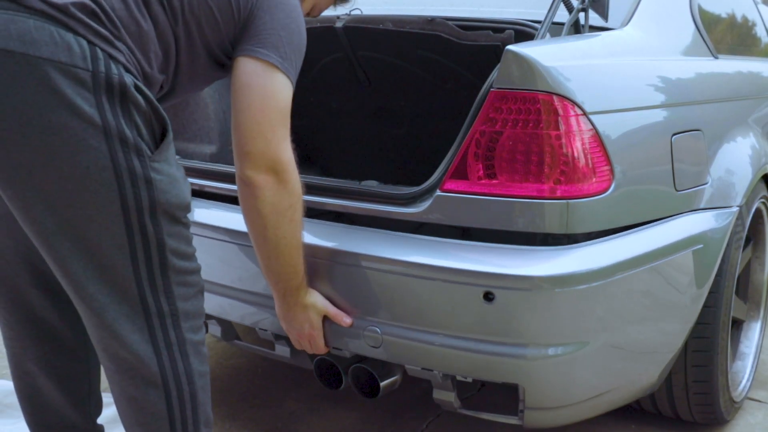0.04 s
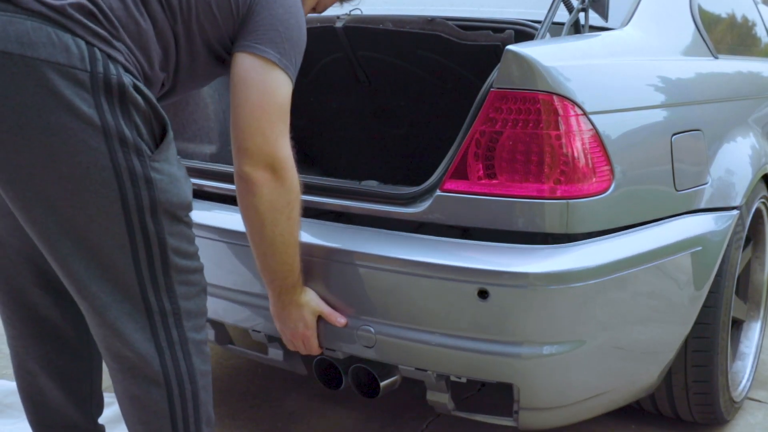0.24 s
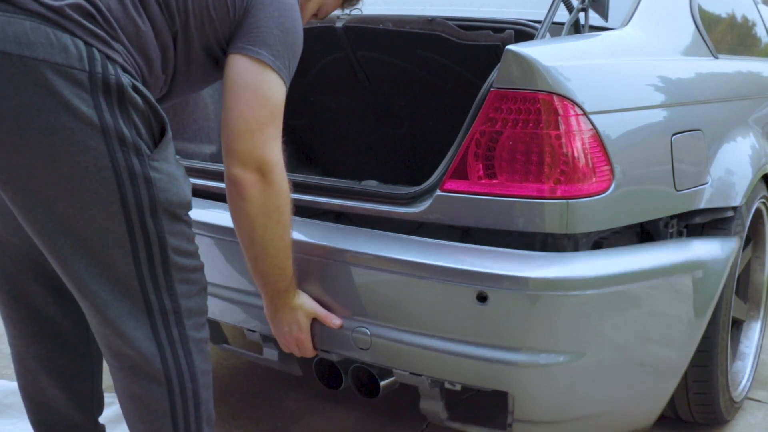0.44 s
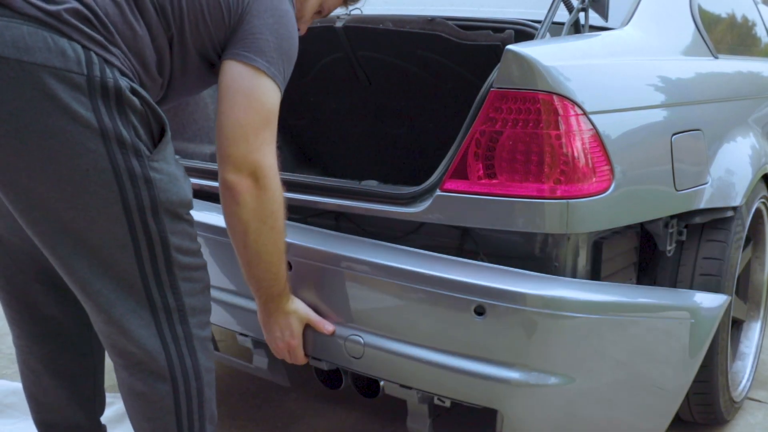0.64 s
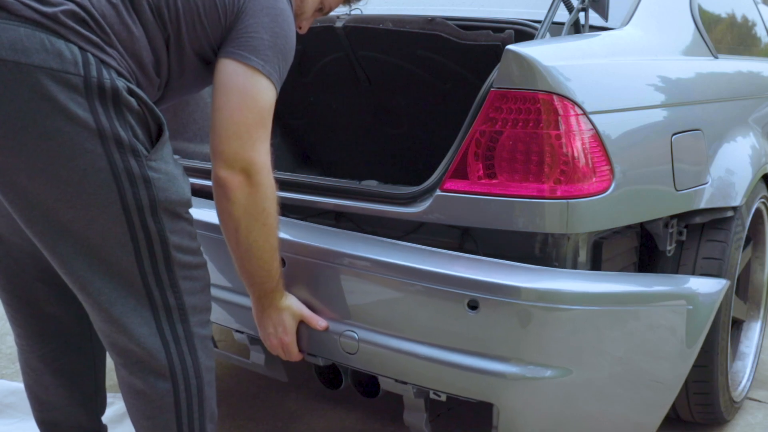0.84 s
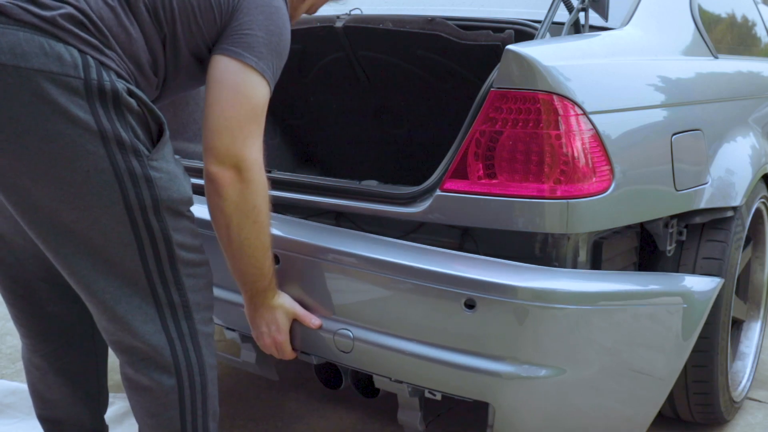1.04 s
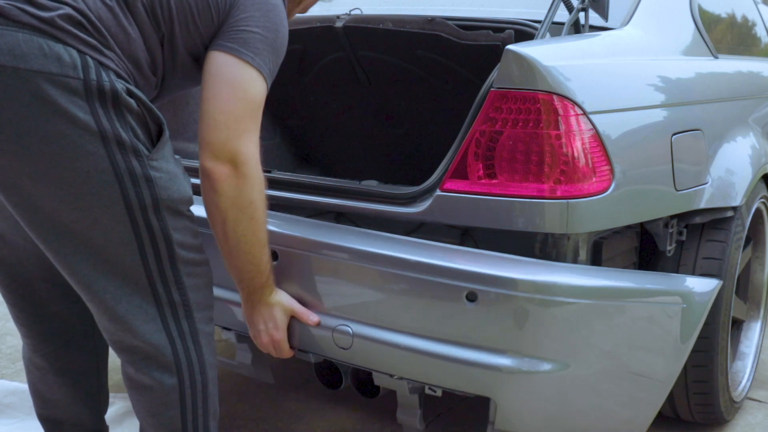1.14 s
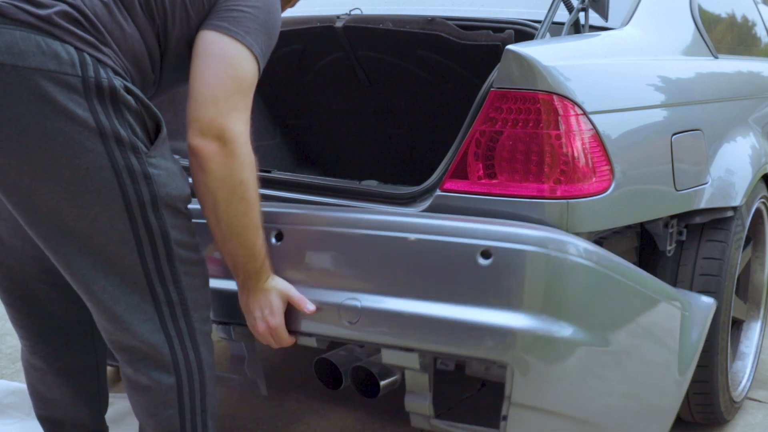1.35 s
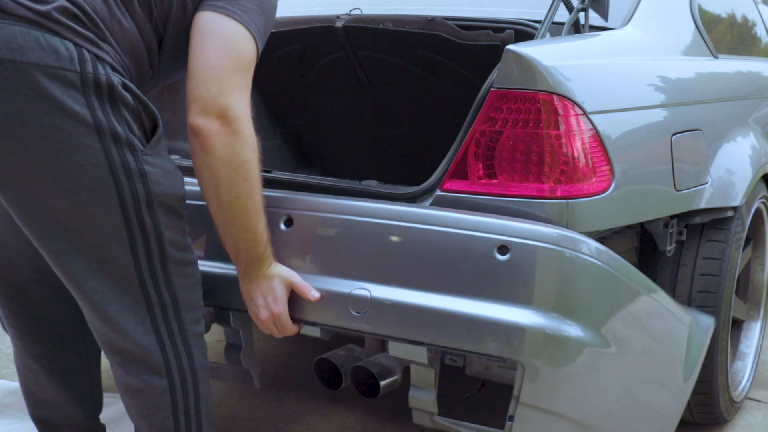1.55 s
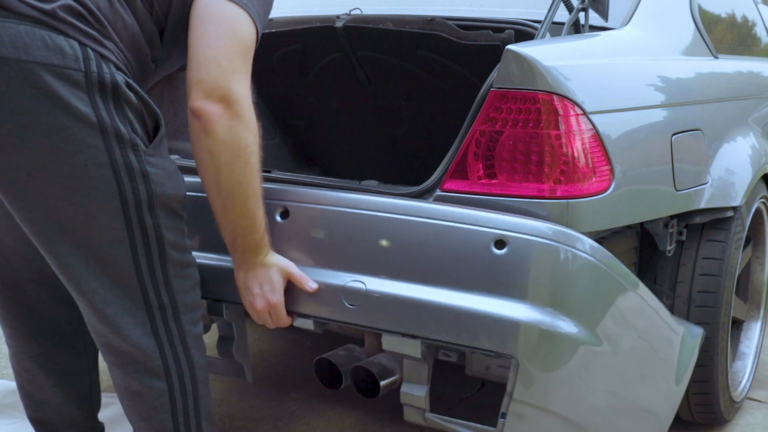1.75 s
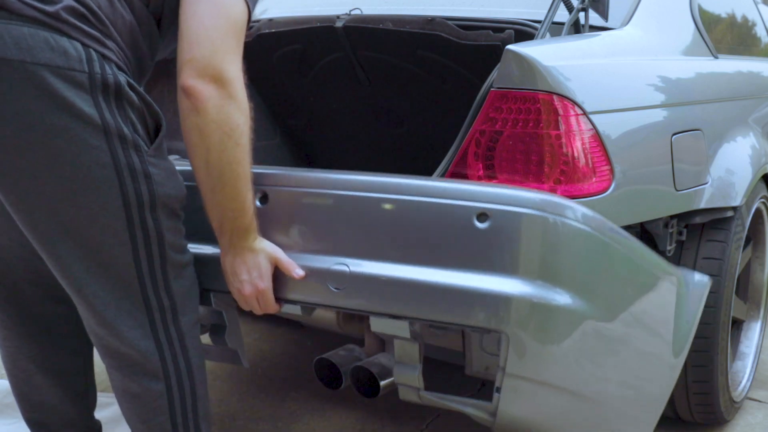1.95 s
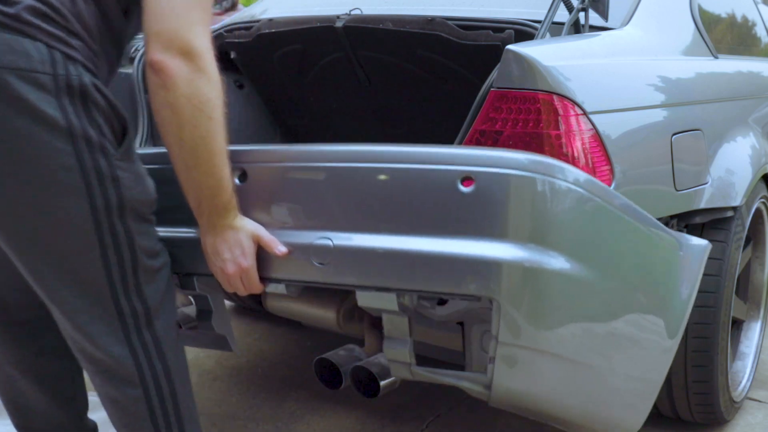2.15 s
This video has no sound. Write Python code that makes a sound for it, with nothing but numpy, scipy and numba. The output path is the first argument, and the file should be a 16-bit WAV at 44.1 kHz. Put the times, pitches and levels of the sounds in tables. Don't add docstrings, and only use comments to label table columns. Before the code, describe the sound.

A plastic car bumper cover is wrenched loose with hollow snaps, then knocks, slaps and scrapes

```python
import sys
import numpy as np
from scipy import signal
from scipy.io import wavfile
from scipy.ndimage import uniform_filter1d
from numba import njit

SR = 44100
rng = np.random.default_rng(int(sys.argv[2]) if len(sys.argv) > 2 else 0)


def materialize(psi):
    bounded = np.clip(np.atleast_2d(psi).T, -1, 1)
    quanta = np.round(bounded * 32767).astype(np.int16)
    wavfile.write(sys.argv[1], SR, quanta)


def magnitude_from_level(level_db):
    exponent = np.asarray(level_db, float) / 20
    return 10 ** exponent


N = 97020

# pitch_hz, level_db, t60_s
HUNG_MODES = [(175, 7, 0.079), (203, 1.5, 0.14), (288, -7, 0.1), (350, -8, 0.23), (460.7, -3.5, 0.095),
              (494.4, 6, 0.05), (775, -4.5, 0.06), (890, -5, 0.062), (1190, -11, 0.048), (1350, -16, 0.07),
              (1680, -12.5, 0.061), (1070, -7, 0.066), (2380, -10.5, 0.044), (3440, -13, 0.078)]
LOOSE_MODES = [(252, 3.5, 0.14), (296.8, -0.5, 0.16), (2620, 4.5, 0.038), (454.4, -14, 0.13),
               (561.8, 5.5, 0.083), (688.5, -2.5, 0.095), (745, -6, 0.046), (850, 1.5, 0.041),
               (1000, 0, 0.063), (1178, -5, 0.12), (1363, -4.5, 0.078), (1636, 2, 0.047), (2000, 1, 0.041),
               (2370, 3, 0.03)]
FREE_MODES = [(140, 1.5, 0.22), (183.6, -8, 0.33), (255.7, -3.5, 0.12), (280.5, -1.5, 0.23),
              (394, -2, 0.14), (442, 1.5, 0.051), (526, -3, 0.13), (690, 0.5, 0.027), (858, -0.5, 0.03),
              (1116, -7, 0.16), (1378, -8, 0.059), (1733, -7.5, 0.055), (2216, -8, 0.023),
              (3260, -19.5, 0.08)]
# pitch_hz, level_db, t60_s
RECOIL_MODES = [(260, -21, .09), (395, -6.5, 0.26), (500, -21, 0.13), (587, -2, .08), (662, -1.5, 0.078),
                (761, -1, 0.11), (855, 0.5, 0.045), (1034, -6, 0.1), (1145, -5.5, 0.097),
                (1383, -4.5, 0.079), (1590, -7, 0.054), (1960, -8, 0.13), (2130, -1.5, 0.062),
                (2150, -20, .08)]
# pitch_hz, level_db, t60_s
LIP_MODES = [(173, 7.5, .2), (262, 2.5, 0.1), (352, -3.5, 0.16), (420, -2.5, 0.26), (451, -7.5, 0.088),
             (496, 0, 0.23), (850, -9.5, 0.17), (1084, -0.5, 0.08), (1335, -1, 0.13), (1424, -2, 0.13),
             (1740, 2, .08), (2414, 8.5, 0.081), (2930, 11.5, 0.06), (3230, 19, 0.082)]

# start_s, peak_db, favoured_hz, crack_db, chatter_s
HUNG_BLOWS = [
    (.001, -32, 386, -18, 0.0073),
    (0.182, -25.5, 1000, -11.5, 0.029),
    (0.227, -0.5, 436, -5, 0.0041),
    (0.2475, -5, 432, -7, 0.0039),
    (.256, -4.5, 420, 0, 0.0056),
    (.281, -9, 536, -5.5, 0.0035),
    (0.294, -15, 453, -30, 0.0061),
    (.322, -20, 350, -9, 0.0041),
    (0.384, -40.5, 2000, 29, 0.0021),
]
LOOSE_BLOWS = [
    (0.464, -24.5, 350, -11, 0.0036),
    (0.502, -19, 534, -8, 0.016),
    (.533, -2.5, 790, -14.5, 0.007),
    (.540, -2.5, 620, -7, 0.0051),
    (0.565, -15, 297, -45, 0.0022),
]
RECOIL_BLOWS = [
    (0.595, -17.5, 800, -4.5, 0.006),
    (.603, -4, 840, -12.5, 0.0044),
    (0.627, -18.5, 776, -6, 0.0025),
]
CLIP_BLOWS = [
    (0.68, -34, 2640, 2, 0.0043),
    (0.691, -27, 700, 5, 0.0054),
    (.715, -40, 553, -14, 0.0026),
    (0.807, -35.5, 2120, 10, 0.023),
    (.828, -33.5, 2000, 9, 0.0082),
]
FREE_BLOWS = [(.848, -23.5, 243, -7, 0.0031), (0.876, -55, 203, -39, 0.0034),
              (0.934, -34.5, 195, -30.5, 0.0015), (1.05, -35.5, 530, -4, 0.044),
              (1.09, -29.5, 700, -13, 0.0054), (1.123, -21, 450, -20, 0.026),
              (1.145, -17.5, 350, -51, 0.0083), (1.152, -18.5, 384, -42, 0.0075),
              (1.2, -37, 7100, 27, 0.0033), (1.307, -23.5, 630, 9, 0.011), (1.322, -30.5, 1000, 4.5, 0.053),
              (1.524, -35.5, 300, 18, 0.006), (1.567, -36, 503, -6, 0.0098), (1.585, -34, 635, -2, 0.014),
              (1.679, -34.5, 1480, -2.5, 0.021), (1.702, -36, 930, 13, 0.021),
              (1.832, -25.5, 1350, -9.5, 0.0055), (1.849, -32, 470, 3, 0.005),
              (2.047, -44, 7000, 20, 0.0047)]
# start_s, peak_db, favoured_hz, crack_db, chatter_s
SLAP_BLOWS = [
    (1.421, -9.5, 510, -5.5, 0.0019),
    (1.428, -10.5, 603, -9.5, 0.013),
    (1.441, -20.5, 470, -7, 0.023),
    (1.468, -21.5, 259, -7, 0.02),
    (1.457, -22, 540, -7, 0.0044),
    (1.498, -36, 230, -1, 0.0086),
]
# start_s, peak_db, favoured_hz, crack_db, chatter_s
TICKS = [
    (.4285, -39, 580, -1, 0.0035),
    (.4355, -28.5, 470, -4, 0.004),
    (.453, -35, 690, -7, 0.006),
    (.482, -32, 500, -10, 0.0019),
    (1.342, -58, 560, -10, 0.018),
    (0.55, -8, 850, -25, 0.0029),
    (0.64, -28, 230, -30, 0.0044),
    (.858, -29.5, 730, -16, 0.01),
]

# start_s, length_s, peak_db, favoured_hz, hiss_db
HUNG_DRAGS = [
    (0.33, 0.075, -40.5, 7360, 6),
]
LOOSE_DRAGS = [
    (0.419, 0.056, -25, 700, -2.5),
    (0.74, 0.056, -39, 1030, 0),
    (0.833, 0.03, -44, 1370, -6),
]
FREE_DRAGS = [
    (1.095, 0.084, -24.5, 645, -9.5),
    (1.94, 0.096, -35, 1180, -15),
    (2.001, 0.15, -39.5, 2000, -9),
]

# pitch_hz, level_db_per_hz
CRACK_SPECTRUM = [(220, 8.5), (555, -8), (1390, -9.5), (2520, -18), (5000, -30.5), (6500, -26.5),
                  (8500, -40), (16000, -49)]
CRACK_TILT_DB_PER_OCT = (2.5, -5.5, 3, 1, 1.5, 11.5, -5)
CRACK_BITE_DB = (-2, -2.5, -1, -5, -4, 0, -17.5)

# start_s, length_s, peak_db, from_hz, to_hz
SQUEAKS = [(0.679, 0.005, -34.5, 8240, 7900), (0.69, 0.012, -36.5, 6820, 9000),
           (0.699, 0.0042, -38, 9000, 8500), (0.719, 0.012, -39, 9500, 8280),
           (.761, 0.013, -38, 8870, 7430), (0.799, 0.0094, -37, 9840, 9000),
           (0.83, 0.0063, -41, 8860, 8200), (1.113, 0.02, -40.5, 3100, 3030),
           (1.952, 0.018, -45.5, 3850, 3680), (.679, 0.011, -34.5, 2620, 2616),
           (.806, 0.011, -40, 2170, 1990), (.827, 0.017, -40, 2080, 1860), (.828, 0.017, -40, 1516, 1464),
           (.829, 0.03, -47, 2940, 2970), (.85, 0.0084, -36, 1430, 1350)]
# peak_db, pitch_hz, t60_s
WOBBLES = [
    (-31.5, 146, 0.84),
    (-41, 146, 0.64),
    (-42, 113, 0.23),
    (-40, 75, 0.19),
    (-29.5, 102, 0.24),
    (-34, 116, 0.13),
]
WOBBLE_START_S = (1.145, 1.31, .848, 1.425, .235, .56)
# pitch_hz, level_db_per_hz
AIR_SPECTRUM = [(28, -5.5), (55, -4), (130, 3), (300, -5.5), (1000, -14), (2300, -25.5), (5000, -29.5),
                (16000, -34.5)]

SPAN = 12288


def colour(table, hz):
    table_hz, table_db = np.array(table).T
    return np.interp(np.log(hz), np.log(table_hz), table_db)


def peak(x, db):
    return x * magnitude_from_level(db) / np.max(np.abs(x))


def add(out, start_s, x):
    i = max(int(start_s * SR), 0)
    out[i:i + len(x)] += x[:len(out) - i]


def bands(step_oct):
    edge = 2 ** (step_oct / 2)
    result = []
    for hz in 28 * 2 ** np.arange(0, 9.4, step_oct):
        sos = signal.butter(2, [hz / edge, hz * edge], "band", fs=SR, output="sos")
        result.append((hz, signal.sosfilt(sos, rng.standard_normal(N + SPAN))))
    return result


def walk(rate_hz):
    hold = int(SR / 40)
    steps = np.repeat(rng.standard_normal(N // hold + 1), hold)
    slewed = uniform_filter1d(steps, int(SR / rate_hz))[:N]
    return slewed / slewed.std()


@njit
def ring(x, hz, gain, t60_s):
    y, one = np.zeros(len(x)), np.zeros(len(x))
    for k in range(len(hz)):
        pole, z, top = np.exp((2j * np.pi * hz[k] - np.log(1000) / t60_s[k]) / SR), 0j, 0.
        for i in range(len(x)):
            z = z * pole + x[i]
            one[i], top = z.imag, max(top, z.real ** 2 + z.imag ** 2)
        y += one * (gain[k] / np.sqrt(top))
    return y


def micro_impacts(force, per_s, grit_db):
    chance = rng.random(SPAN)
    sign = np.sign(chance * SR % 1 - .5)
    taps = (chance < per_s / SR) * magnitude_from_level(grit_db * rng.exponential(size=SPAN)) * sign
    taps[1] = magnitude_from_level(grit_db)
    return taps * force + 1e-18


def shell_boom(modes, taps, spot_hz, damp):
    spot_oct, scatter_db, detune, pair = 1.0, 1.5, .008, .012
    hz, db, t60_s = np.repeat(np.array(modes, float), 2, axis=0).T
    scatter, drift = rng.standard_normal((2, len(hz)))
    side = (-1.) ** np.arange(len(hz))
    polarity = np.repeat(side[:len(modes)], 2)
    db = db - 6 * (np.log2(hz / spot_hz) / spot_oct) ** 2 + scatter_db * scatter
    hz = hz * (1 + detune * drift + pair / 2 * side)
    return ring(taps, hz, magnitude_from_level(db) * polarity, np.maximum(t60_s * damp, .01))


def shell_crack(noise, taps, start_s, spot_hz, damp, tilt_db_per_oct, bite_db):
    t60_1khz_s, t60_power, bite_hz = 0.12, -0.24, 1600
    i, crack = int(start_s * SR), 0
    for hz, band in noise[6:]:
        t60_s = t60_1khz_s * damp * (hz / 1000) ** t60_power
        fall = np.exp(-2 * np.log(1000) / (t60_s * SR))
        energy = signal.lfilter([1], [1, -fall], taps ** 2)
        band_db = colour(CRACK_SPECTRUM, hz) + tilt_db_per_oct * max(np.log2(hz / 5000), 0)
        band_db += bite_db * (bite_hz < hz < 2 * bite_hz)
        band_db -= 7 * max(np.log2(spot_hz / hz), 0)
        crack = crack + magnitude_from_level(band_db) * band[i:i + SPAN] * np.sqrt(energy)
    return crack


def contact(modes, noise, start_s, taps, spot_hz, crack_db, peak_db, tilt):
    damp = magnitude_from_level(0.32 * peak_db)
    boom = shell_boom(modes, taps, spot_hz, damp)
    crack = shell_crack(noise, taps, start_s, spot_hz, damp, *tilt)
    return peak(peak(boom, 0) + peak(crack, crack_db), peak_db)


def shell(noise):
    out, t = np.zeros(N), np.arange(SPAN) / SR
    stages = [
        (HUNG_MODES, HUNG_BLOWS, HUNG_DRAGS),
        (LOOSE_MODES, LOOSE_BLOWS, []),
        (RECOIL_MODES, RECOIL_BLOWS, []),
        (LOOSE_MODES, CLIP_BLOWS, LOOSE_DRAGS),
        (FREE_MODES, FREE_BLOWS, FREE_DRAGS),
        (LIP_MODES, SLAP_BLOWS, []),
        (LOOSE_MODES, TICKS, []),
    ]
    for (modes, blows, drags), *tilt in zip(stages, CRACK_TILT_DB_PER_OCT, CRACK_BITE_DB):
        for start_s, db, hz, crack_db, chatter_s in blows:
            force = np.clip(1.3 - t / max(chatter_s, .001), 0, 1)
            taps = micro_impacts(force, per_s=2200, grit_db=2.2)
            add(out, start_s, contact(modes, noise, start_s, taps, hz, crack_db, db, tilt))
        for start_s, length_s, db, hz, hiss_db in drags:
            force = np.sin(np.pi * np.clip(t / length_s, 0, 1)) ** .5
            taps = micro_impacts(force, per_s=3500, grit_db=1.6)
            add(out, start_s, contact(modes, noise, start_s, taps, hz, hiss_db, db, tilt))
    return signal.sosfilt(signal.butter(4, 105, "high", fs=SR, output="sos"), out)


def squeaks():
    rough, overtone_db, hiss_db, hiss_hz = .8, -12, -25, 5960
    span = 4000
    out = np.zeros(N)
    for start_s, length_s, db, from_hz, to_hz in SQUEAKS:
        chance = rng.standard_normal((3, span))
        wobble = 5 * rough * min(to_hz / 8000, 1) * uniform_filter1d(chance, 25)
        t = np.arange(span) / SR / length_s
        glide_hz = to_hz + (from_hz - to_hz) * np.exp(-4.0 * t)
        phase = 2 * np.pi * np.cumsum(glide_hz) / SR + wobble[0]
        env = np.minimum(t / 0.43, 1) * np.exp(-np.maximum(t - .6, 0) * 2.2) * (1 + wobble[1])
        tone = np.sin(phase)
        if from_hz > hiss_hz:
            hiss = signal.lfilter(*signal.butter(2, hiss_hz, "high", fs=SR), chance[2])
            tone = tone + magnitude_from_level(overtone_db) * np.sin(2 * phase) + magnitude_from_level(hiss_db) * hiss
        add(out, start_s, peak(env * tone, db))
    return out


def wing():
    out, t = np.zeros(N), np.arange(SR) / SR
    rough = magnitude_from_level(1.7 * walk(33))
    for start_s, (db, hz, t60_s) in zip(WOBBLE_START_S, WOBBLES):
        env = 1000. ** (-t / t60_s) * np.clip(t / 0.03, 0, 1)
        add(out, start_s, peak(np.sin(2 * np.pi * hz * t) * env, db))
    return out * rough


def reflections(near):
    level_db, t60_s, build_s, dull_hz = -21, 0.32, 0.0038, 3220
    t = np.arange(SPAN) / SR
    tail = rng.standard_normal(SPAN) * 1000. ** (-t / t60_s) * np.clip(t / build_s, 0, 1) ** 2
    tail = signal.lfilter(*signal.butter(1, dull_hz, fs=SR), tail)
    tail = tail / np.sqrt(np.sum(tail ** 2))
    return magnitude_from_level(level_db) * signal.fftconvolve(near, tail)[:N]


def air():
    level_db, swell_db, flicker_db = -45.5, 1.2, 1.8
    swell, out = walk(8.5), np.zeros(N)
    for hz, band in bands(0.5045):
        drift_db = (swell_db * swell + flicker_db * walk(3.9)) * min(400 / hz, 1)
        out += magnitude_from_level(colour(AIR_SPECTRUM, hz) + drift_db) * band[:N]
    return out * magnitude_from_level(level_db) / out.std()


def scene():
    near = shell(bands(.5)) + squeaks() + wing()
    return (near + reflections(near) + air())[None]


def band_limit(x):
    return signal.sosfilt(signal.butter(12, 16470, fs=SR, output="sos"), x)


def record(dry):
    rounded = np.tanh(0.62 * dry) / 0.55
    low_pass = signal.ellip(10, .2, 70, 16200, fs=SR, output="sos")
    mix = signal.sosfilt(low_pass, rounded)
    return band_limit(mix)


dry = scene()
out = record(dry)
materialize(out)
```